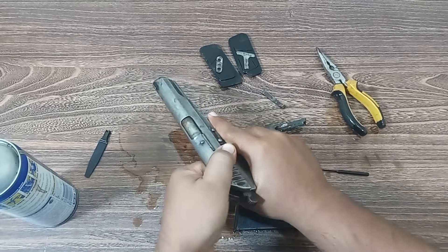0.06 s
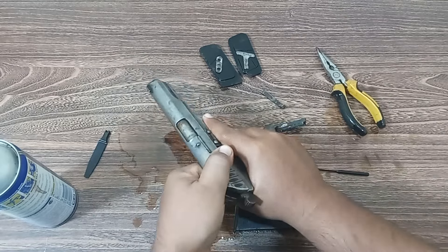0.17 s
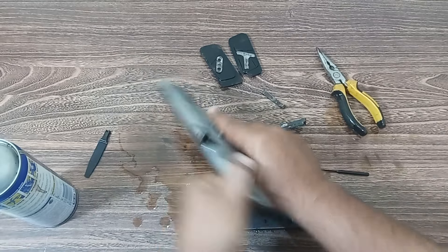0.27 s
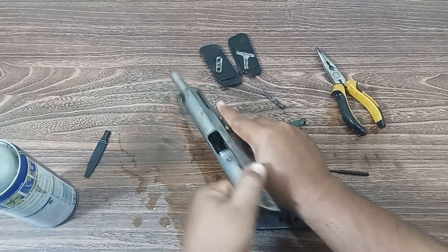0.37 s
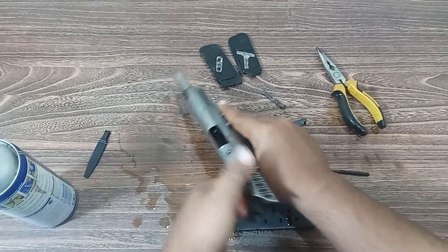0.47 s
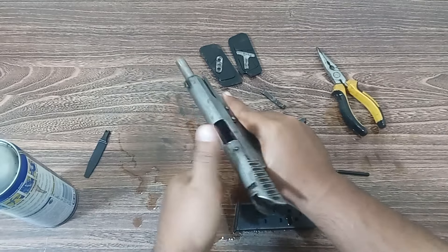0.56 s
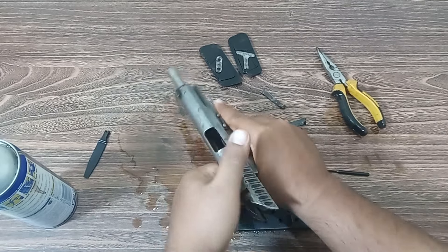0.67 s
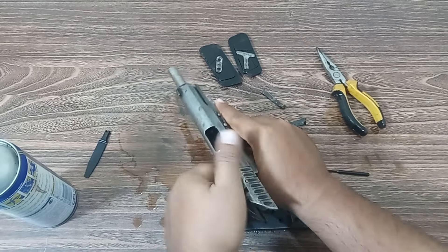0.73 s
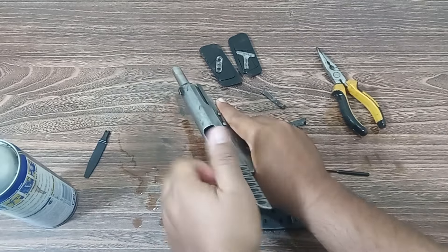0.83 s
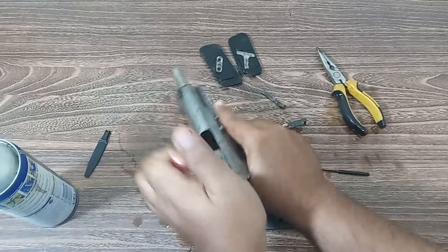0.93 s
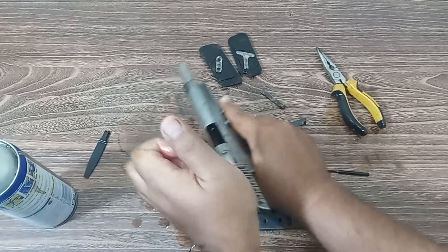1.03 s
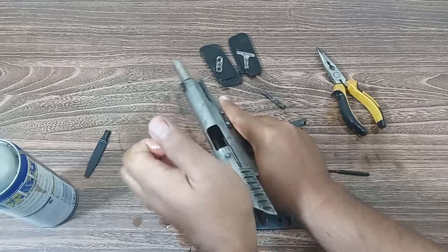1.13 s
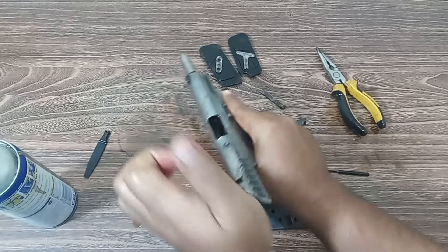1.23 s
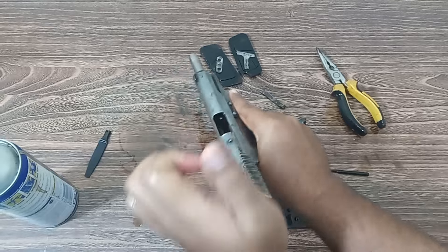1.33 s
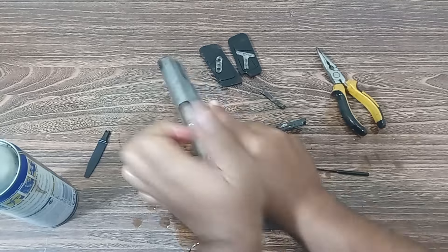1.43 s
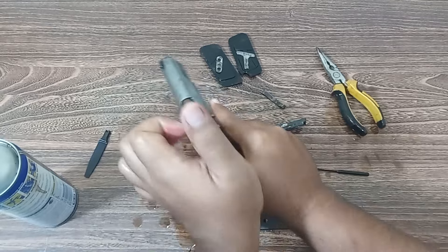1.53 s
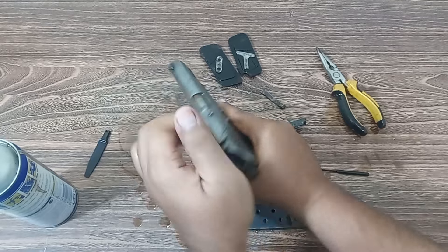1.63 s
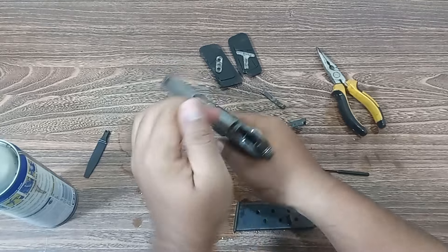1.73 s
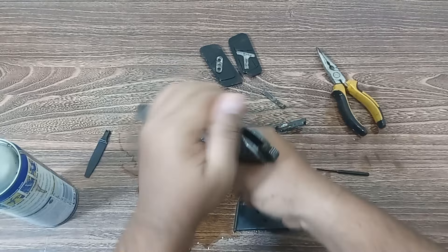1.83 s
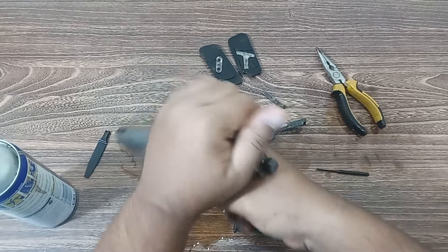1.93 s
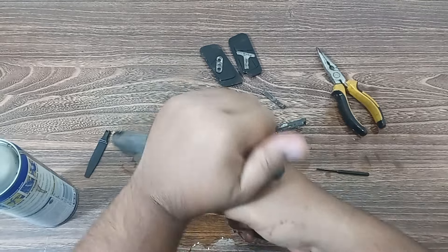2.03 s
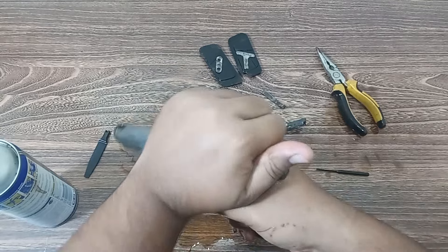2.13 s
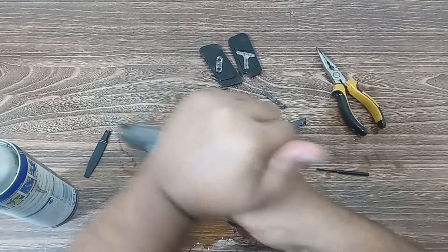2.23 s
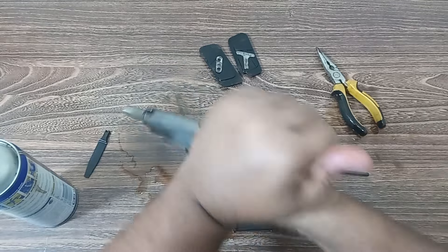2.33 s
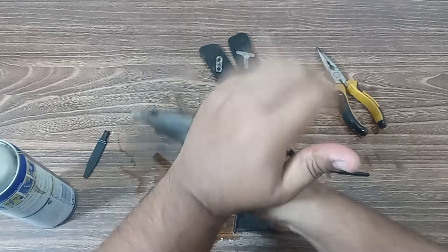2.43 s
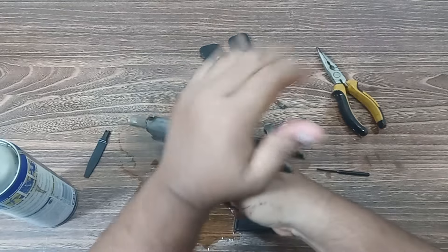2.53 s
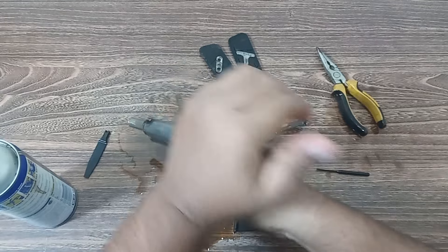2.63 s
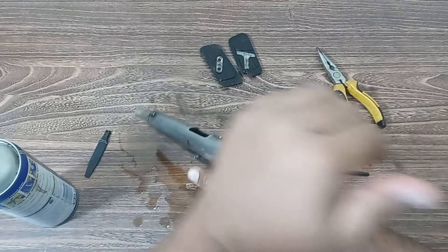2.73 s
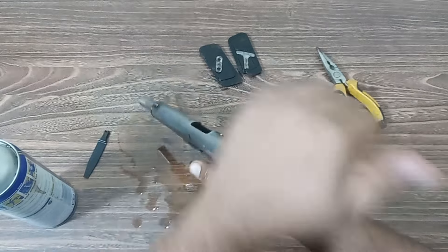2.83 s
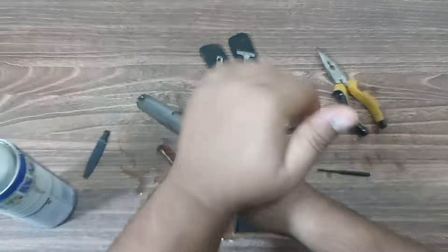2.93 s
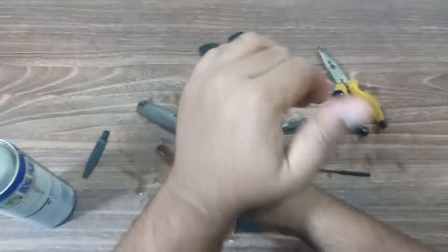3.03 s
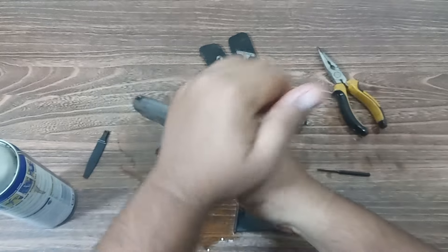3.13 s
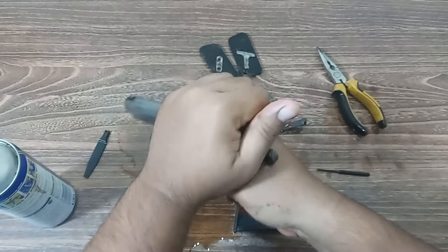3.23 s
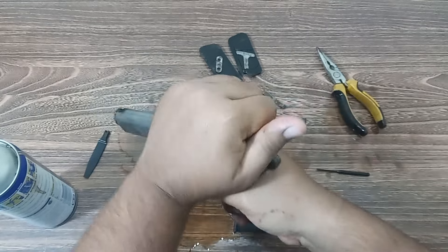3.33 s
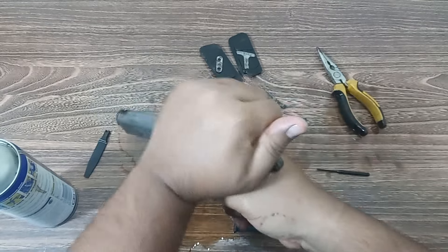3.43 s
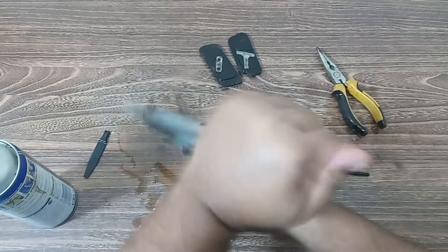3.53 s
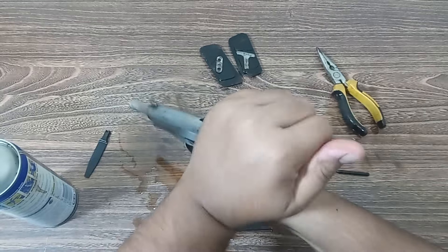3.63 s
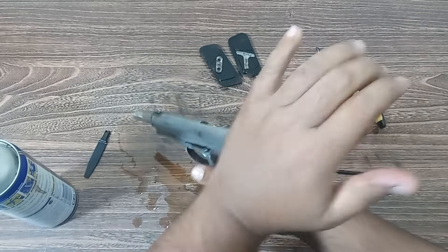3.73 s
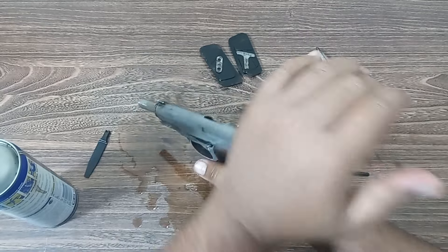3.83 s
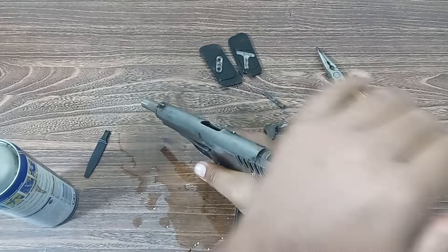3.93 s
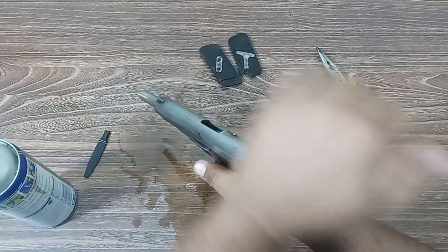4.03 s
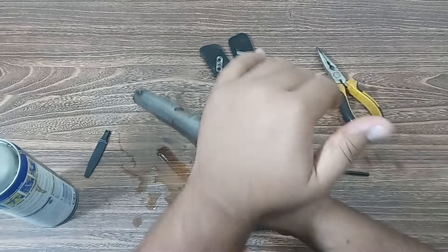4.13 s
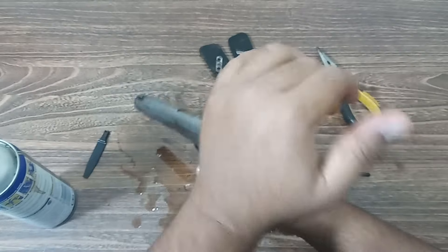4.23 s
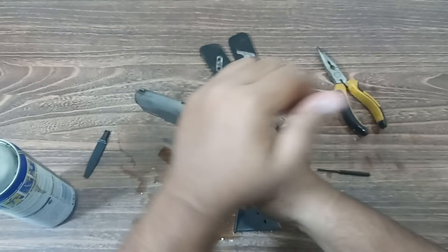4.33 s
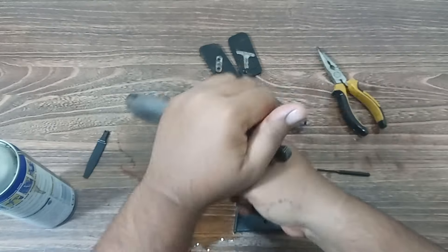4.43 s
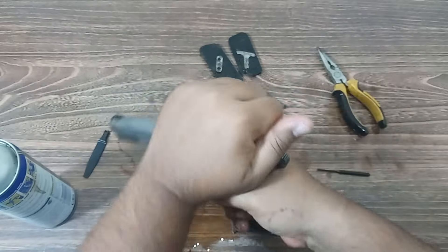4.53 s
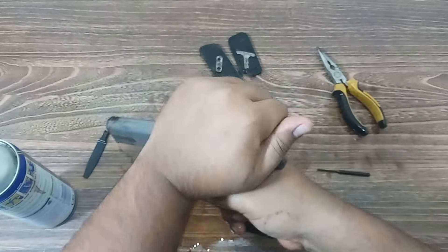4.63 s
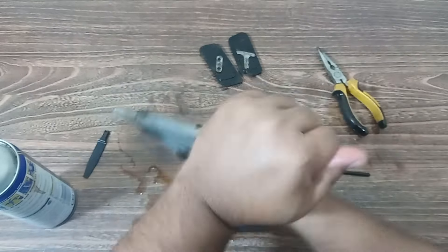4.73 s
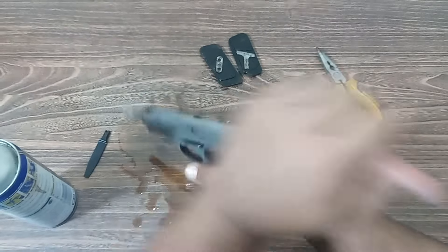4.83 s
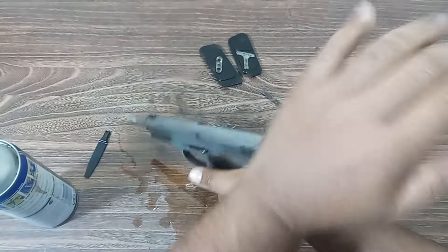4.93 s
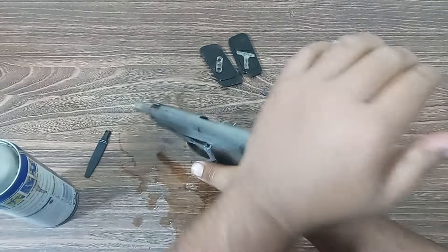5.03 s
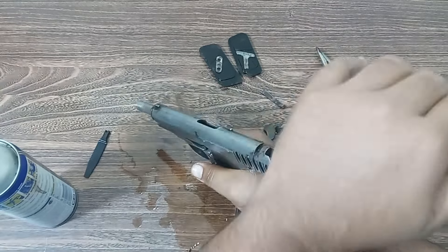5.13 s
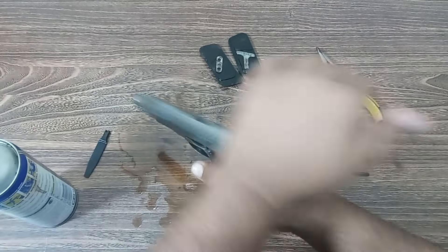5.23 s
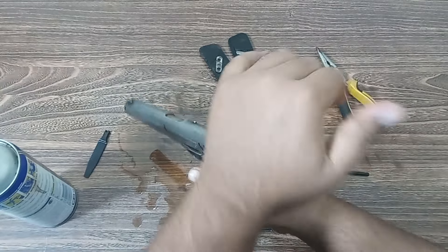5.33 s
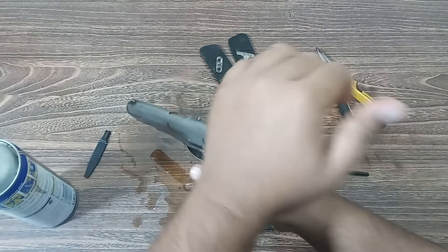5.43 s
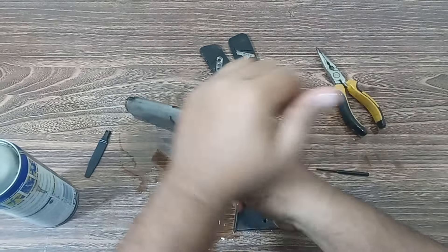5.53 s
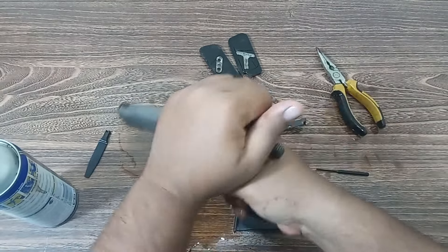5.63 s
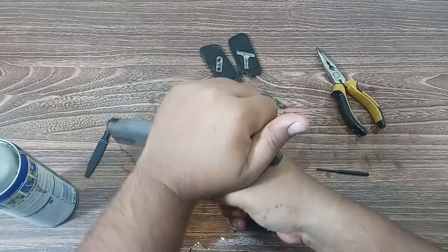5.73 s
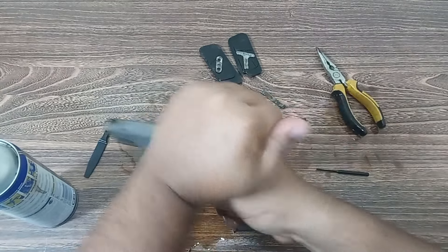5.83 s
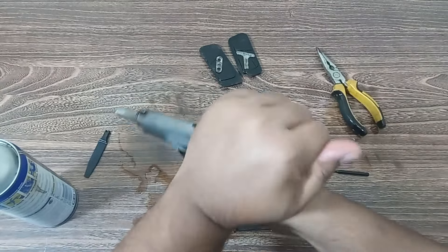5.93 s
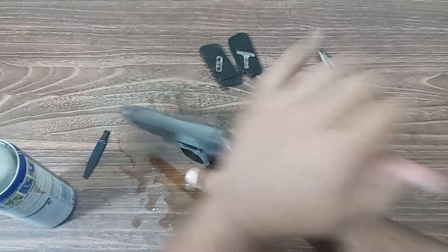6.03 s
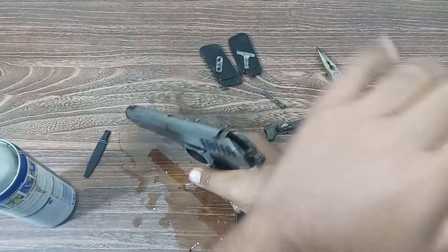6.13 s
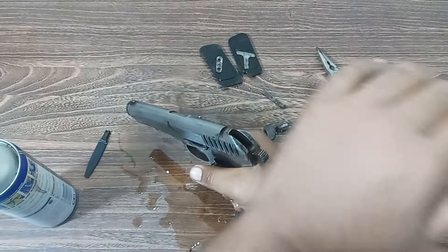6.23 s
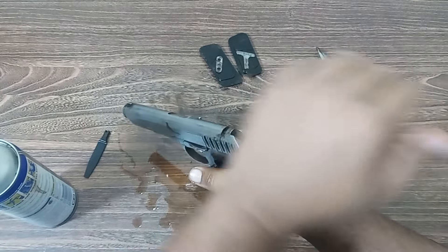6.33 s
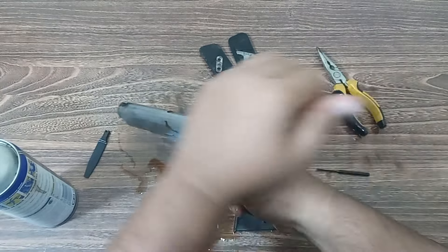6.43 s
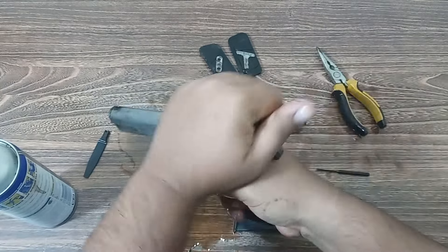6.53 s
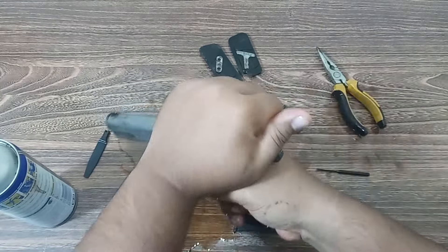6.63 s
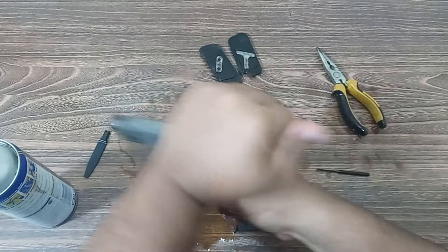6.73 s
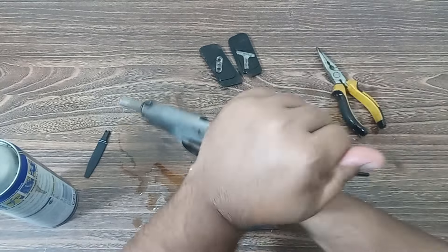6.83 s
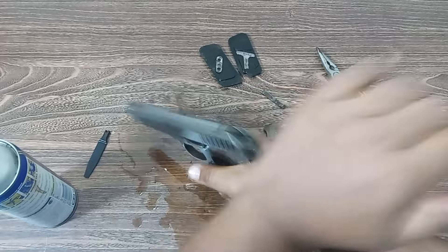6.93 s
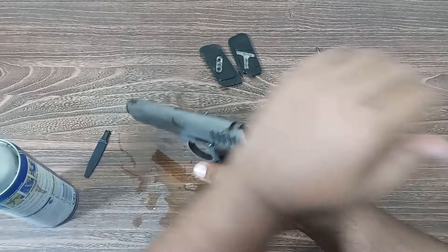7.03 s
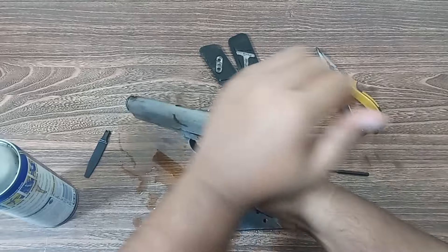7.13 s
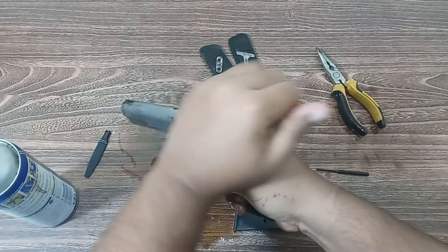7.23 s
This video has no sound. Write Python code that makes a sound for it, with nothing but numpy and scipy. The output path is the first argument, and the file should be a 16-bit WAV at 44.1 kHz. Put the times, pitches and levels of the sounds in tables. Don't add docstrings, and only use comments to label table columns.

```python
import sys
import numpy as np
from scipy import signal
from scipy.fft import rfft, irfft
from scipy.io import wavfile
from scipy.ndimage import uniform_filter1d

SR = 44100
rng = np.random.default_rng(int(sys.argv[2]) if len(sys.argv) > 2 else 0)


def persist_wave(psi):
    counts = np.round(np.clip(psi, -1, 1) * 32767).astype(np.int16)
    wavfile.write(sys.argv[1], SR, np.atleast_2d(counts).T)


def gain_from_db(level_db):
    decades = np.asarray(level_db, float) / 20
    return 10 ** decades


N = 321048

# [t/s, peak level/dB, starts this far down/dB, held up for/s, gate closes after/s]
SHUT_WASHES = [
    (0.029, -21.5, 11, 0.08, .45),
    (1.481, -19.5, 11.5, 0.16, 0.51),
    (2.935, -20, 4, 0.18, 0.48),
    (4.127, -19.5, 7, 0.17, 0.46),
    (5.303, -20, 8, 0.18, 0.43),
    (6.1, -19.5, 10, 0.17, .7),
    (6.995, -19.5, 5, 0.15, 0.23),
]
OPEN_WASHES = [
    (0.355, -31.5, 1.1, 0.015, .17),
    (2.327, -21.5, 17, 0.12, .41),
    (3.581, -20.5, 26, 0.074, .35),
    (4.765, -20, 23, 0.083, .37),
    (5.939, -21.5, 13, 0.087, .4),
    (6.822, -19.5, 30, 0.04, .4),
]


def rms_one(x):
    return x / np.sqrt(np.mean(x ** 2) + 1e-20)


def colour(x, spectrum):
    hz = np.maximum(np.fft.rfftfreq(4096, 1 / SR), 1)
    points = np.array(spectrum)
    level_db = np.interp(np.log(hz), np.log(points[:, 0]), points[:, 1])
    cepstrum = irfft(np.log(gain_from_db(level_db)))
    cepstrum[1:2048] *= 2
    cepstrum[2049:] = 0
    response = irfft(np.exp(rfft(cepstrum)))
    return signal.fftconvolve(x, response)[:len(x)]


def band(x, low_hz, high_hz):
    return signal.sosfilt(signal.butter(4, [low_hz, high_hz], "band", fs=SR, output="sos"), x)


def split(x, edges_hz):
    hz = np.maximum(np.fft.rfftfreq(len(x), 1 / SR), 1)
    above = [np.clip(.5 + 8 * np.log(hz / edge), 0, 1) for edge in edges_hz]
    shares = -np.diff([np.ones_like(hz), *above, np.zeros_like(hz)], axis=0)
    return irfft(shares * rfft(x), len(x))


def resonances(x, modes):
    out = 0
    for k, (hz, width_hz, level_db) in enumerate(modes):
        r = np.exp(-np.pi * width_hz / SR)
        gain = (1 - r * r) / 2
        mode = signal.lfilter([gain, 0, -gain], [1, -2 * r * np.cos(2 * np.pi * hz / SR), r * r], x)
        out = out + (-1) ** k * gain_from_db(level_db) * mode
    return out


def ring(clicks, hz, t60):
    r = gain_from_db(-60 / (t60 * SR))
    w = 2 * np.pi * hz / SR
    return signal.lfilter([0, np.sin(w)], [1, -2 * r * np.cos(w), r * r], clicks + 1e-18)


def grains(per_s, spread_db, bed):
    sizes = gain_from_db(spread_db * np.minimum(rng.exponential(1, N), 5)) * rng.choice([-1, 1], N)
    clicks = sizes * (rng.random(N) < per_s / SR)
    return rms_one(rms_one(clicks) + bed * rng.standard_normal(N))


def drift(per_s):
    r = np.exp(-2 * np.pi * per_s / SR)
    return rms_one(signal.lfilter([1], [1, -2 * r, r * r], rng.standard_normal(N)))


def ducked_db():
    # [t/s, drop/dB]
    drops = [(0.267, 6.5), (1.448, 24.5), (1.468, 3), (2.268, 6), (2.287, 0), (2.306, 7), (2.908, 1.5),
             (3.520, 0), (3.554, 14), (3.569, 6.5), (4.107, 4), (4.12, 12), (4.706, 5), (4.747, 24),
             (5.268, 17), (5.298, 1), (5.872, 2), (5.907, 12), (6.068, 11), (6.088, -1), (6.328, 1),
             (6.363, 5.5), (6.769, 17), (6.806, 0), (6.968, 12)]
    steps = np.zeros(N)
    for s, drop_db in drops:
        steps[round(s * SR)] = drop_db
    return uniform_filter1d(np.cumsum(steps), size=31)


def background():
    # [f/Hz, level/dB per Hz]
    room_colour = [(24, -30.5), (40, 4), (66, -8), (96, -6.5), (215, -14), (283, -15.5), (345, -22.5),
                   (1120, -29), (3650, -29.5), (6490, -19), (7930, -47.5), (16000, -46)]
    hiss = gain_from_db(-74.5) * rms_one(colour(rng.standard_normal(N), room_colour))
    lumps = rms_one(signal.lfilter([1], [1, -1.998, .998001], rng.standard_normal(N)))
    return band(hiss, 350, 18000) + gain_from_db(2.5 * lumps - 3) * band(hiss, 50, 350)


def steel(x):
    # [f/Hz, level/dB per Hz]
    blow_colour = [(410, -23), (700, -14), (1310, -4), (1930, -7), (2610, -2), (3750, 0), (4990, -4.5),
                   (5690, 7.5), (6480, 16.5), (8630, -8), (9830, -5), (13300, -16), (14900, -9.5),
                   (15700, -9)]
    # [f/Hz, width/Hz, level/dB]
    slide_modes = [(2067, 180, 1), (4490, 250, 9), (5570, 1700, 5), (6421, 793, 15), (15200, 670, -55.5)]
    return colour(x, blow_colour) + resonances(x, slide_modes)


def contacts(ducked):
    # [t/s, peak level/dB, 1-3 kHz body level/dB]
    touches = [
        (2.2223, -38, -20),
        (2.2488, -37.5, -6.5),
        (3.504, -41, 4),
        (4.6895, -32, -2.5),
        (5.8559, -34, -1.5),
        (6.747, -37, -0.5),
    ]
    unlocks = [
        (0.259, -33, 1.5),
        (2.2634, -18.5, -9),
        (3.5127, -15, -13.5),
        (4.6984, -18.5, -16.5),
        (5.8631, -28, -22),
        (6.7627, -33.5, -30),
    ]
    cocks = [
        (0.2822, -9.5, -17.5),
        (2.2811, -12.5, -14.5),
        (3.5294, -8, -22),
        (4.717, -5.5, -22),
        (5.8826, -8.5, -17.5),
        (6.7729, -10, -19.5),
    ]
    catches = [
        (0.2955, -12.5, -12.5),
        (0.3083, -8.5, -15.5),
        (0.3223, -16, -19),
        (2.2955, -5, -15),
        (3.5463, -11, -13),
        (4.7323, -6, -15.5),
        (5.9011, -5.5, -15),
        (6.79, -8.5, -17.5),
    ]
    stops = [
        (0.3372, -12.5, -8.5),
        (2.312, -11.5, -31),
        (3.564, -8, -23),
        (4.7518, -12.5, -25),
        (5.9222, -10, -19),
        (6.808, -11, -29),
    ]
    slips = [
        (1.437, -17.5, -11.5),
        (1.4423, -25.5, -12.5),
        (1.4522, -26.5, -22.5),
        (2.8957, -20.5, -18.5),
        (4.084, -23.5, -13),
        (4.089, -23.5, -20.5),
        (4.1012, -17.5, -21),
        (5.2602, -43, -2.5),
        (5.264, -22, -16),
        (5.2773, -32.5, -34),
    ]
    slams = [
        (0.0084, -14.5, -11),
        (0.0174, -7, -21),
        (1.459, -4, -17.5),
        (2.9157, -2, -18.5),
        (4.11, -7.5, -16.5),
        (5.286, -2, -15.5),
        (6.077, -9, -15.5),
        (6.0796, -3, -16),
        (6.9754, -6, -13),
        (6.979, -7.5, -39),
    ]
    rebounds = [(.0005, -7, -20.5), (1.464, -7, -17), (2.2195, -47, -22), (2.3153, -12, -32),
                (2.9222, -13.5, -25), (2.926, -12.5, -36), (3.552, -20, -14), (3.566, -16, -22),
                (3.5333, -17, -25), (4.111, -5.5, -16), (4.115, -5, -19), (0.3125, -9.5, -20),
                (4.118, -8, -22), (4.7549, -8, -24), (5.268, -21, -20), (5.294, -14, -28),
                (5.8865, -13, -24), (5.899, -22, -22), (5.9252, -9.5, -28), (6.765, -36, -18),
                (6.7757, -15.5, -25), (6.7865, -20, -20)]
    # [low knock/dB, burst t60/s, rattle left behind/dB]
    shared_by_step = [(-27, 0.081, -23), (-23, 0.038, -14), (-32, 0.03, -22), (-38.5, 0.014, -13.5),
                      (-35, 0.013, -5.5), (-36.5, 0.048, -6), (-25, 0.025, -21.5)]
    rebound_step = (-29.5, 0.0075, -22.5)
    echo_s, echo_db = 0.001, 2.5

    edge, top, body, low = np.zeros((4, N))
    impacts = grains(4000, spread_db=2.5, bed=0.8)
    size = np.std(steel(impacts))
    t = np.arange(round(.06 * SR)) / SR
    step_tables = (touches, unlocks, cocks, catches, stops, slips, slams, rebounds)
    for rows, (knock_db, t60, rattle_db) in zip(step_tables, shared_by_step + [rebound_step]):
        for s, peak_db, body_db in rows:
            i = round(s * SR)
            span = slice(i, i + len(t))
            burst = gain_from_db(-60 * t / max(t60, .002)) * np.minimum(t / 0.00041, 1)
            echo = gain_from_db(echo_db) * np.interp(t - echo_s, t, burst, left=0)
            rattle_power = gain_from_db(2 * (rattle_db - 580 * t))
            shape = np.sqrt(burst ** 2 + echo ** 2 + rattle_power)
            shape = shape * gain_from_db(peak_db + ducked[i] - ducked[span])
            edge[span] += gain_from_db(0.42 * peak_db + 1.5) * shape
            top[span] += shape
            body[span] += gain_from_db(body_db + 13.0) * shape
            low[span] += gain_from_db(knock_db + 13.0) * shape
            impacts[i + 40] = 0.62
    bands = (edge, 8000, 18000), (top, 2900, 8000), (body, 800, 2900)
    layers = sum(band(steel(impacts * gain), low_hz, high_hz) for gain, low_hz, high_hz in bands)
    knock = gain_from_db(5.0) * band(impacts * low, 200, 800)
    return gain_from_db(-9) * (layers / size + knock)


def table_thumps():
    # [t/s, peak level/dB, low tone f/Hz, upper tone f/Hz, upper tone level/dB]
    slam_thumps = [
        (.009, -48, 263, 823, -40),
        (1.46, -24.5, 284, 487, -14.5),
        (2.917, -21.5, 211, 520, -10.5),
        (4.11, -29, 434, 807, 2),
        (5.287, -27.5, 284, 430, -6),
        (6.08, -23, 172, 422, 1),
        (6.977, -40.5, 204, 468, 10),
    ]
    # [t/s, peak level/dB, low tone f/Hz]
    stop_thumps = [
        (0.281, -58, 319),
        (0.341, -45, 316),
        (2.313, -41.5, 261),
        (3.564, -45.5, 248),
        (4.753, -42, 305),
        (5.921, -47.5, 263),
        (6.808, -46.5, 317),
    ]
    slam_push_db = (-40.5, -28.5, -53.5, -36, -30.5, -57, -28)
    stop_push_db = (-60.5, -60.5, -40, -39, -34, -44, -44)
    stop_upper_hz, stop_upper_db = 520, 0.1
    fade_s = 0.007

    out = np.zeros(N)
    t = np.arange(round(0.0084 * SR)) / SR
    swell = np.sin(np.pi * t / t[-1] * .999) ** .4
    swell = swell * np.exp(.5 - t / fade_s)
    thumps = slam_thumps + [row + (stop_upper_hz, stop_upper_db) for row in stop_thumps]
    for (s, peak_db, low_hz, high_hz, high_db), push_db in zip(thumps, slam_push_db + stop_push_db):
        low_tone = np.sin(2 * np.pi * low_hz * t)
        high_tone = gain_from_db(high_db) * np.sin(2 * np.pi * high_hz * t)
        push = gain_from_db(push_db - peak_db)
        i = round(s * SR)
        out[i:i + len(t)] -= gain_from_db(peak_db) * (low_tone + high_tone - push) * swell
    return out


def wash_shape(age, peak_db, down_db, held_s, gate_s, linger_db, tone):
    rise_s = 0.016
    held_db_per_s, room_db_per_s = 34, 79.5
    treble_knee_db, treble_depth_db = -37.5, 38
    bass_late_db, bass_ungated = 12, 0.48
    bass_loss = 0.11
    linger_db_per_s = 11.5
    linger_treble_db, linger_bass_db = -15.5, -13.5

    gate_db_per_s, treble_db, loss, knee_loss, bass_db = tone
    rising = np.clip(1 - age / rise_s, 0, 1)
    held = held_db_per_s * np.clip(age - rise_s, 0, max(held_s - rise_s, 0))
    decay = held + room_db_per_s * np.maximum(age - max(held_s, rise_s), 0)
    gated = gate_db_per_s * np.maximum(age - gate_s, 0)
    far = linger_db - linger_db_per_s * age
    near = peak_db - down_db * rising - decay - gated
    level = 10 * np.log10(gain_from_db(2 * near) + gain_from_db(2 * far))
    below = np.maximum(treble_knee_db - (peak_db - decay - gated), 0)
    treble_loss = loss * (decay + down_db * rising) + knee_loss * below
    treble = treble_db - np.minimum(treble_loss, treble_depth_db)
    bass = bass_db + 1.5 - bass_loss * decay - bass_late_db * rising
    bass = bass + np.minimum(bass_ungated * gated, 16)
    treble = np.maximum(treble, far - level + linger_treble_db)
    bass = np.maximum(bass, far - level + linger_bass_db)
    return level, treble, bass


def rings_of(shake, parts, barrel_db, age):
    # [f/Hz, width/Hz, level/dB]
    frame_modes = [(1770, 60, -19), (2090, 40, -16)]
    # [f/Hz, width/Hz, level/dB]
    barrel_modes = [(3765, 70, 0), (3920, 45, -5)]
    rings_db, outlast_db_per_s, high_loss_db_per_s = -3, 9, 6
    end_s, fade_db_per_s = .75, 60

    mix = rms_one(resonances(shake, sorted(list(map(tuple, parts)) + frame_modes)))
    under, low, high, over = split(mix, (1500, 4200, 7500))
    barrel = rms_one(resonances(shake[::-1], barrel_modes))
    low = low + gain_from_db(barrel_db - rings_db) * barrel
    young = np.minimum(age, .55)
    gain_db = rings_db + outlast_db_per_s * young - fade_db_per_s * np.maximum(age - end_s, 0)
    return gain_from_db(gain_db) * (low + gain_from_db(-high_loss_db_per_s * young) * high)


def wash(blows, spectrum, tone, rings, own_db, ducked):
    # [f/Hz, width/Hz, level/dB]
    board_modes = [(316, 31, -12)]
    air_loss = [0, 18, 34, 36]
    patchy_db, patches_per_s = 2.5, 15
    treble_gate_db, treble_gate_slope = -80, 1.5

    echoes = grains(2500, spread_db=3.2, bed=1.6)
    bass, main, *treble = split(colour(echoes, spectrum), (1450, 7700, 9200, 11500, 14000))
    treble = treble / np.std(np.sum(treble, axis=0))
    treble = treble * gain_from_db(patchy_db * np.array([drift(patches_per_s) for row in treble]))
    main = rms_one(main)
    shake = rng.standard_normal(N)
    bass = rms_one(bass) + gain_from_db(board_modes[0][2]) * rms_one(resonances(shake, board_modes))
    starts = np.sort([row[0] for row in SHUT_WASHES + OPEN_WASHES] + [N / SR + 1])
    out = np.zeros(N)
    for (s, *shape), parts, (barrel_db, linger_db) in zip(blows, rings, own_db):
        next_start = starts[starts > s][0]
        i = np.arange(round((s - .012) * SR), min(round(next_start * SR), N))
        age = i / SR - s
        fade = np.clip(np.minimum(i - i[0], i[-1] + 200 - i) / 300, 0, 1)
        ducked_then = ducked[round(s * SR)]
        fade = fade * gain_from_db(ducked_then - np.maximum(ducked[i], ducked_then))
        level, treble_db, bass_db = wash_shape(age, *shape, linger_db, tone)
        ringing = rings_of(shake[i], parts, barrel_db, age)
        eaten = np.outer(air_loss, -np.minimum(age, .55))
        sunk = np.maximum(treble_gate_db - level - treble_db - eaten, 0)
        airy = gain_from_db(treble_db) * np.sum(gain_from_db(eaten - treble_gate_slope * sunk) * treble[:, i], axis=0)
        out[i] += gain_from_db(level - 4.5) * fade * (main[i] + ringing + airy + gain_from_db(bass_db) * bass[i])
    return out


def shut_wash(ducked):
    # [f/Hz, level/dB per Hz]
    spectrum = [(120, -76.5), (200, -48), (316, -28.5), (400, -38), (489, -29.5), (1520, -22), (2000, -13),
                (2980, -13.5), (3780, -10.5), (4450, -8), (6540, -4.5), (8750, -18), (13600, -20.5),
                (15700, -20.5)]
    # [gate/dB per s, treble level/dB, treble loss/dB per dB of decay, same below knee, bass level/dB]
    tone = (76, -9, 0.54, 3.3, -27.5)
    # [f/Hz, width/Hz, level/dB]
    rings = [
        [(1920, 48, -10), (2920, 61, -12), (3410, 150, -10), (4000, 28, -10), (4360, 29, -8), (4880, 56, -8),
         (5170, 44, -7), (6300, 64, -2), (6750, 230, 0), (7000, 24, -2)],
        [(1960, 53, -10), (2290, 94, -10), (2790, 150, -11), (3290, 47, -9), (3790, 130, -2), (4380, 97, -6),
         (4870, 86, -4), (5140, 65, -4), (6010, 67, -3), (6560, 200, 0)],
        [(2030, 44, -15), (3750, 90, -5), (3960, 67, -8), (4140, 100, -10), (4400, 35, -10), (5490, 110, -4),
         (5870, 21, -6), (6230, 51, -2), (6690, 84, 0), (6980, 34, -6)],
        [(2230, 53, -10), (3730, 60, -4), (3920, 54, -3), (4210, 46, -5), (4940, 64, -3), (5420, 57, -1),
         (5660, 110, -1), (6360, 150, 0), (6820, 57, -4), (7070, 50, -3)],
        [(2170, 170, -12), (3810, 71, -5), (4020, 94, -8), (5040, 28, -5), (5230, 42, -4), (5490, 82, -2),
         (5670, 100, 0), (5870, 26, -3), (6470, 48, -3), (6680, 220, -2)],
        [(3330, 83, -7), (3810, 100, -1), (4280, 75, -4), (4810, 26, -3), (5030, 99, -1), (5840, 39, -4),
         (6070, 72, -3), (6300, 100, -2), (6560, 52, 0), (6850, 140, -1)],
    ]
    # [f/Hz, width/Hz, level/dB]
    last_rings = [(3500, 78, -7), (3720, 51, -3), (3910, 75, 0), (4390, 95, -7), (4940, 48, -2),
                  (5190, 300, -2), (5590, 88, -3), (6020, 81, -6), (6850, 470, -1), (7330, 38, -7)]
    # [barrel ring level/dB, far echoes left under the gate/dB]
    own_db = [(-31.5, -69), (-11.5, -66), (-12, -58), (-11, -81), (-15, -63), (-11.5, -51), (-9, -60)]
    return wash(SHUT_WASHES, spectrum, tone, rings + [last_rings], own_db, ducked)


def open_wash(ducked):
    # [f/Hz, level/dB per Hz]
    spectrum = [(120, -83.5), (200, -59), (316, -19), (400, -28), (447, -24.5), (1490, -23.5), (2030, -9),
                (2350, -13), (4540, -1), (6540, -0.5), (7030, -1.5), (8750, -30.5), (13100, -30.5),
                (15700, -27.5)]
    # [gate/dB per s, treble level/dB, treble loss/dB per dB of decay, same below knee, bass level/dB]
    tone = (107, -15, 0.47, 1, -25.5)
    # [f/Hz, width/Hz, level/dB]
    rings = [
        [(3860, 55, -6), (4360, 35, -7), (4970, 88, 0), (5360, 36, -6), (6380, 64, -1), (6540, 49, -2)],
        [(2090, 160, -18), (2510, 65, -16), (3260, 180, -14), (3620, 35, -12), (4700, 43, -4), (5130, 99, -5),
         (5380, 30, -6), (6490, 86, 0)],
        [(2100, 58, -13), (2580, 38, -16), (3350, 47, -13), (4520, 99, -5), (5080, 110, -4), (5460, 160, -2),
         (6510, 74, 0), (6760, 30, -2)],
        [(1710, 82, -21), (2120, 160, -17), (2800, 150, -13), (4530, 140, -3), (5140, 41, -4), (5470, 110, -4),
         (6490, 89, 0)],
        [(2300, 82, -11), (4020, 86, -5), (4530, 110, -3), (5100, 56, -2), (5640, 76, -1), (6340, 65, 0),
         (6510, 100, 0), (6780, 56, 0)],
        [(2300, 110, -10), (4020, 43, -2), (4530, 90, 0), (5120, 66, 0), (5700, 190, -1), (6540, 100, 0),
         (6790, 110, -1), (7330, 22, -6)],
    ]
    # [barrel ring level/dB, far echoes left under the gate/dB]
    own_db = [(-31, -71), (-25, -64), (-29.5, -71), (-18, -82), (-26.5, -57.5), (-18, -70)]
    return wash(OPEN_WASHES, spectrum, tone, rings, own_db, ducked)


def pings(ducked):
    # [t/s, f/Hz, level/dB, t60/s]
    lone_rings = [
        (3.44, 5800, -60, .1),
        (1.135, 3600, -65, 0.023),
        (1.924, 1190, -43.5, 0.033),
        (2.072, 3860, -54, 0.05),
                  (.311, 4960, -34, .55),
        (.2825, 4150, -21, .03),
    ]
    # [t/s, peak level/dB, f/Hz]
    struck_notes = [(0.3087, -11.5, 4950), (0.338, -9, 4100), (1.4392, -8.5, 3180), (2.2628, -13, 4400),
                    (2.281, -1, 4280), (2.297, -21, 4620), (2.3114, -5, 4600), (2.8952, -12, 4480),
                    (3.5134, -21, 4970), (3.5297, -20, 4500), (3.5456, -14, 2030), (3.565, 0, 5120),
                    (4.6987, -29, 5500), (4.7167, -15, 4400), (4.7326, -11.5, 4680), (4.752, -1, 5130),
                    (5.863, -28.5, 3470), (5.885, -33, 4600), (5.901, -1, 3160), (5.922, -3.5, 4970),
                    (6.7476, -53.5, 2140), (6.7735, -25, 4300), (6.79, -1, 4290), (6.8084, -2, 4940),
                    (6.791, -6.5, 2140), (6.747, -26, 1210)]
    out = np.zeros(N)
    click = np.zeros(round(.2 * SR))
    click[0] = 1
    soft = np.minimum(np.arange(len(click)) / 60, 1)
    struck = [(s, hz, peak_db - 14.0, .035) for s, peak_db, hz in struck_notes]
    for s, hz, level_db, t60 in lone_rings + struck:
        i = round(s * SR)
        span = slice(i, i + len(click))
        out[span] += gain_from_db(level_db + ducked[i] - ducked[span]) * soft * ring(click, hz, t60)
    return out


def lead_ins():
    # [start t/s, end t/s, end level/dB]
    scrapes = [
        (0.882, 1.075, -74),
        (1.432, 1.44, -44),
        (2.208, 2.22, -59),
        (2.888, 2.899, -34.5),
        (4.077, 4.095, -46),
        (5.258, 5.267, -45),
        (5.843, 5.86, -56),
    ]
    gain = np.zeros(N)
    for start, end, level_db in scrapes:
        i = np.arange(round(start * SR), round(end * SR))
        gain[i] = gain_from_db(level_db + np.linspace(-18, 0, len(i)))
    scrape = rng.standard_normal(N)
    return steel(gain * scrape) / np.std(steel(scrape))


def murmurs():
    # [start t/s, end t/s, f/Hz, width/Hz, level/dB]
    swells = [
        (.98, 1.05, 5060, 150, -77),
        (1.05, 1.13, 5050, 80, -71),
        (3.12, 3.45, 235, 50, -70),
        (6.25, 6.6, 210, 70, -72),
    ]
    out = np.zeros(N)
    noise = rng.standard_normal(N)
    for start, end, hz, width_hz, level_db in swells:
        i = np.arange(round(start * SR), round(end * SR))
        mode = [(hz, width_hz, 0)]
        narrow = rms_one(resonances(resonances(noise[i], mode), mode))
        out[i] = gain_from_db(level_db) * np.hanning(len(i)) * narrow
    return out


def scene():
    ducked = ducked_db()
    blows = contacts(ducked) + table_thumps()
    room = shut_wash(ducked) + open_wash(ducked)
    small_sounds = pings(ducked) + lead_ins() + murmurs()
    return np.tile(background() + blows + room + small_sounds, (2, 1))


def top_cut(x):
    return signal.sosfilt(signal.butter(12, 17140, fs=SR, output="sos"), x)


def record(dry):
    # [f/Hz, level/dB]
    microphone = [(20, 0), (11500, 0), (13400, -4), (14400, 1), (15200, 4), (20000, 4)]
    rumble_cut_hz, top_cut_hz, peak_limit = 68, 15850, .48
    heard = [colour(channel, microphone) for channel in dry]
    firm = signal.sosfilt(signal.butter(3, rumble_cut_hz, "high", fs=SR, output="sos"), heard)
    rounded = peak_limit * np.tanh(firm / peak_limit)
    finished = signal.sosfilt(signal.ellip(8, .5, 36, top_cut_hz, fs=SR, output="sos"), rounded)
    return top_cut(finished)


dry = scene()
out = record(dry)
persist_wave(out)
```